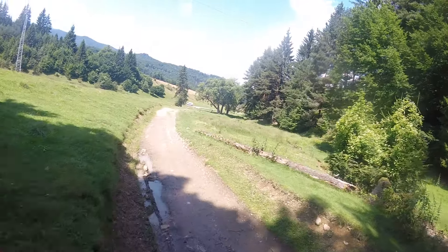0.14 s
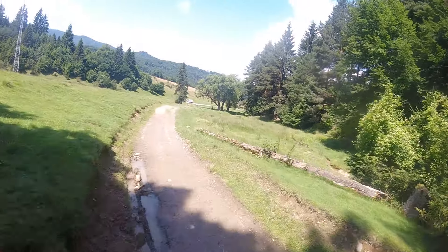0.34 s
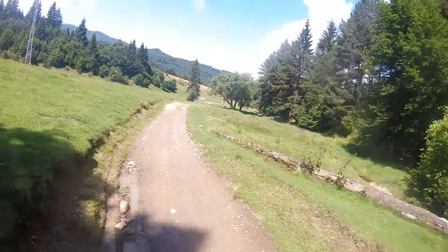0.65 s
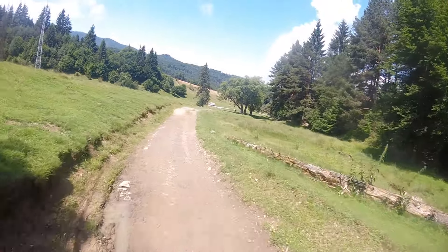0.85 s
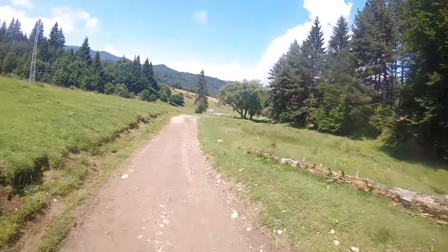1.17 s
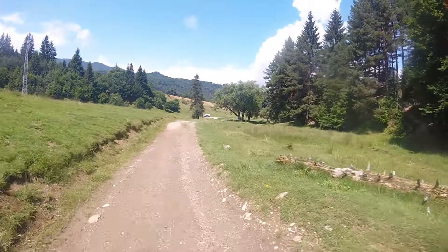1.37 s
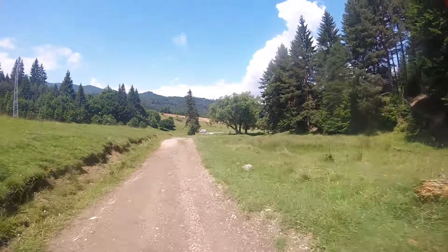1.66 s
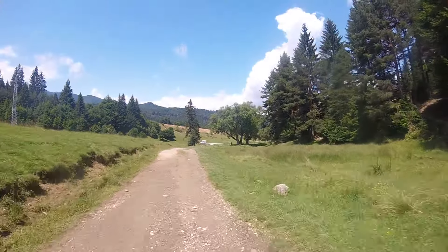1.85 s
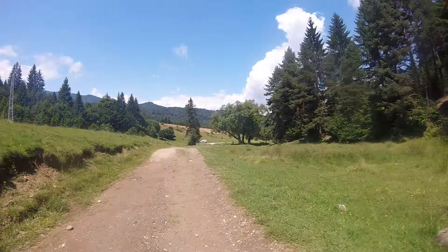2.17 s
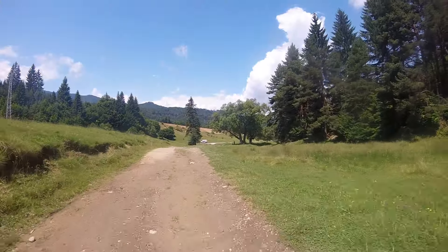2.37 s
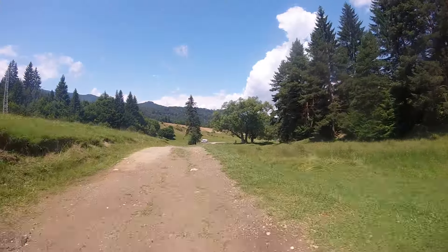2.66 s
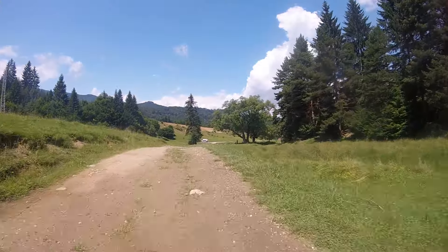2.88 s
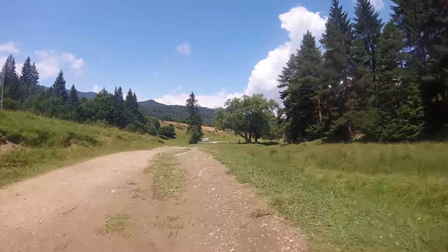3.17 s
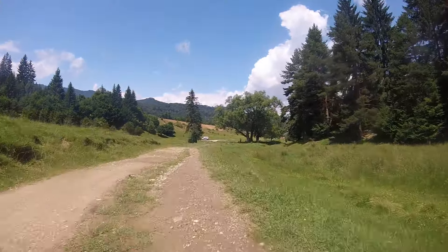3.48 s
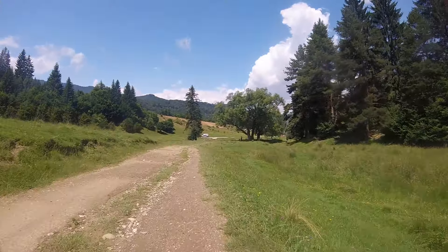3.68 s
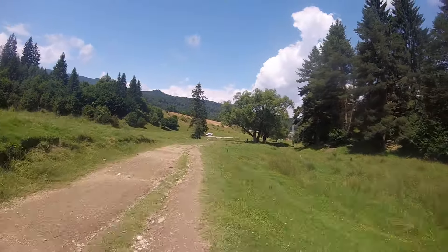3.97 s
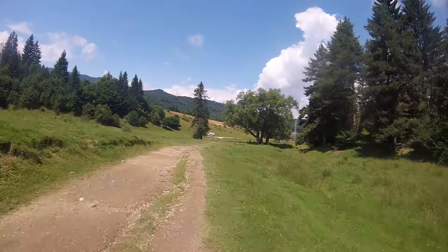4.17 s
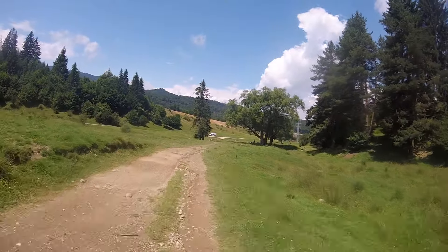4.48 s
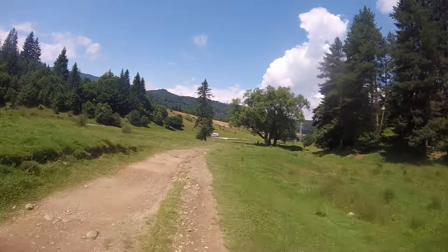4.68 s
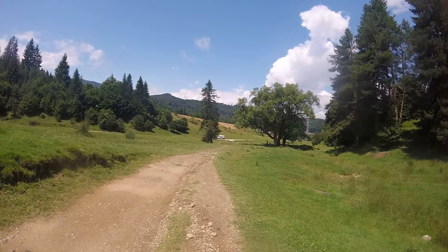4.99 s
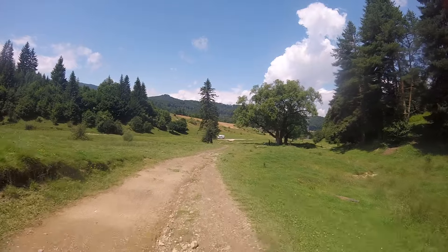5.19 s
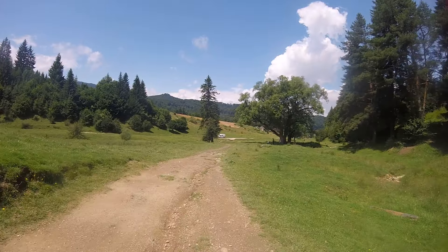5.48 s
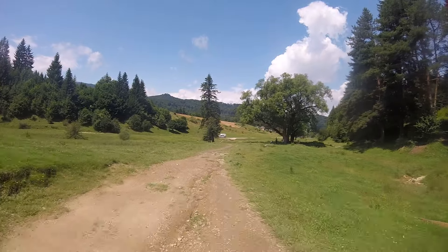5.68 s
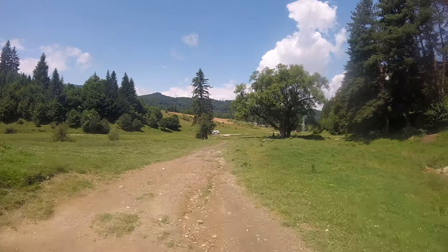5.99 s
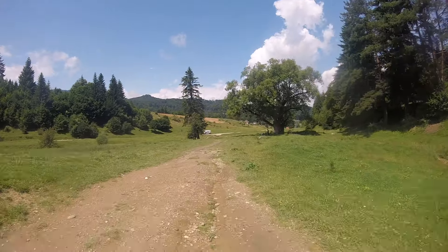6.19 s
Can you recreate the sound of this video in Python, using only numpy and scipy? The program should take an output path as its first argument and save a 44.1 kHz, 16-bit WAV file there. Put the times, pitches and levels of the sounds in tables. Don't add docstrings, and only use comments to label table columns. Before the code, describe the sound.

Continuous close motor drone from a small drone in flight: low lopsided throbbing of two slightly mistuned rotors, higher buzz from two farther ones, propeller hiss and brief thin electrical whine. Throttle changes bend the pitch down and up, highest around three seconds and lowest past five, before it climbs again amid gusty rumble. Dry, open air, microphone shaken inside the case.

```python
import sys
import numpy as np
from scipy import signal
from scipy.io import wavfile
from scipy.ndimage import uniform_filter1d, minimum_filter1d

SR = 44100
rng = np.random.default_rng(int(sys.argv[2]) if len(sys.argv) > 2 else 0)


def invert_db(x):
    u = np.asarray(x, float) / 20
    return 10 ** u


def generate_wav(signal):
    frames = np.transpose(np.atleast_2d(signal))
    scaled = np.clip(frames, -1, 1) * 32767
    pcm = np.round(scaled).astype(np.int16)
    wavfile.write(sys.argv[1], SR, pcm)


N = 279413


def curve(rows):
    s, *columns = np.transpose(rows)
    return [np.interp(np.arange(N) / SR, s, c) for c in columns]


def fine(coarse):
    return np.array([np.interp(np.arange(N) / 100, np.arange(len(c)), c) for c in coarse])


def swells(rows):
    t = np.arange(0, N + 100, 100) / SR
    total = 0
    for middle, half, *db in rows:
        bump = np.cos(np.pi / 2 * np.clip((t - middle) / half, -1, 1)) ** 2
        total = total + np.outer(db, bump)
    return fine(total)


def evened(x):
    return x / np.sqrt(np.mean(x ** 2) + 1e-20)


def drift(hz):
    width = int(SR / hz)
    return evened(uniform_filter1d(uniform_filter1d(rng.standard_normal(N), width), width))


def noise(colour, patchy_db, flicker_db, size=512):
    frames, hz = 4 * N // size + 5, np.fft.rfftfreq(size, 1 / SR)
    a, b, patches = rng.standard_normal((frames, len(hz), 3)).T
    patches = evened(uniform_filter1d(uniform_filter1d(patches, size // 64, 0), 12, 1))
    flicker = evened(uniform_filter1d(rng.standard_normal(frames), 3))
    f, db = np.transpose(colour)
    shape_db = np.interp(np.log(hz + 1), np.log(f), db, right=-120)[:, None]
    z = (a + 1j * b) * invert_db(shape_db + patchy_db * patches + flicker_db * flicker)
    return evened(signal.istft(z, nperseg=size, noverlap=3 * size // 4)[1][:N])


def angle(hz):
    return 2 * np.pi * np.cumsum(hz) / SR


def blades(turn, orders, waver_db, waver_hz):
    out = 0
    for k, db in orders:
        start = 2 * np.pi * rng.random()
        out = out + invert_db(db + waver_db * drift(waver_hz)) * np.cos(np.round(k) * turn + start)
    return out


# (time [s], level [dB])
WIND_LEVEL = [(.04, -41), (.21, -35), (.55, -36), (.7, -32.5), (.95, -33), (1.06, -35), (1.25, -34.5),
              (1.56, -29.5), (1.66, -26.5), (2.2, -23.5), (2.54, -25.5), (2.62, -33), (3.3, -31.5),
              (3.84, -37), (4.45, -35), (5.1, -28), (5.5, -32), (6.3, -29)]
# (middle [s], half length [s], rise [dB])
WIND_GUSTS = [
    (1.93, .1, 4),
    (2.81, .05, 3.5),
    (4.57, .1, 11),
    (5.03, 0.092, 5),
    (5.38, 0.3, 8.5),
    (5.66, 0.24, 10.5),
    (5.84, 0.14, 7.5),
    (5.97, .05, 10),
    (6.07, .04, 4),
    (6.2, .08, 3),
]
# (frequency [Hz], density [dB per Hz])
WIND_COLOUR = [(15, -3), (40, 2.5), (80, -1), (150, 3.5), (260, -5.5), (420, -6), (700, -37), (1200, -54)]


def wind():
    level_db = curve(WIND_LEVEL)[0] + swells(WIND_GUSTS)[0] + 2.0
    return invert_db(level_db) * noise(WIND_COLOUR, 1.0, 0.73, size=1024)


# (time [s], thrust [dB], turbulence [dB])
ROTOR_AIR = [(.2, -43, -35.6), (.36, -46.5, -36), (.62, -46.5, -36.5), (.78, -44, -36.5), (.92, -46, -38.4),
             (1.42, -47.5, -36.5), (1.74, -46, -36.6), (1.98, -48, -38), (2.2, -45.5, -34),
             (2.6, -45.7, -36.4), (3.2, -43, -35.5), (3.7, -46.4, -36), (4.54, -48.5, -37),
             (4.72, -43.5, -33), (5.08, -48, -37.5), (5.7, -42, -30.5), (5.94, -42.5, -31),
             (6.28, -46, -35.5)]
# (frequency [Hz], density [dB per Hz])
WAKE_COLOUR = [(150, -7.5), (400, 4), (700, -3), (1000, 0), (1400, -7), (2000, -11.5), (3000, -20),
               (4200, -33), (6000, -59.5)]
HISS_COLOUR = [(2060, -34), (3500, -11.5), (4180, -12.5), (5160, 1), (7320, 1), (7970, -3.5), (9520, -5.5),
               (11000, -17.5), (14300, -47.5), (22000, -120)]
FIZZ_COLOUR = [(10500, -31.5), (11500, -0.5), (13000, -1), (14500, -3.5), (15300, -13.5)]


def rotor_air(slow, fast):
    hiss_db, wake_db = curve(ROTOR_AIR)
    pulse = 1 + 0.11 * np.cos(fast) + 0.08 * np.cos(slow) + 0.23 * np.cos(3 * fast)
    hiss = invert_db(hiss_db + 0.47) * noise(HISS_COLOUR, 0.59, 0.82, size=256)
    fizz_db = -67.5 + 1.9 * (hiss_db + 41.5) + 1.5 * drift(15)
    fizz = invert_db(fizz_db) * noise(FIZZ_COLOUR, 3.5, 1.5, size=1024)
    wake = invert_db(wake_db + 0.5) * noise(WAKE_COLOUR, 0.8, 0.92)
    return pulse * (hiss + fizz) + wake


# (middle [s], half length [s], lower line [dB], upper line [dB])
COIL_BURSTS = [(.46, .07, 2, 9.5), (1.0, .15, 6, 1), (1.71, .15, 3.5, -2), (2.1, .06, 1, 12),
               (3.47, .08, 4.5, 2), (4.251, .09, 3, 6), (4.76, .3, 1.5, 6), (5.37, .1, 2, 11),
               (5.6, .08, 0, 5), (5.76, .1, 3, -3), (5.91, .08, 2, 7), (6.05, .08, 4, 3)]


def coil_whine():
    thrust_db = 0.7 * (curve(ROTOR_AIR)[0] + 46)
    out = 0
    for burst_db, line_db, hz in zip(swells(COIL_BURSTS), (0, -2.5), (7140, 7550)):
        level_db = -62 + 1.7 * (burst_db + thrust_db + line_db) + 3.7 * drift(25)
        out = out + invert_db(level_db) * np.cos(angle(hz + 12 * drift(50)))
    return out


# (start [s], length [s], near shaft reached [Hz], far shaft reached [Hz])
STICK_MOVES = [(-.2, .1, 173.5, 192), (0, 0.29, 170.2, 199.6), (.29, 0.072, 147.7, 171.2),
               (0.369, 0.058, 143.2, 163.5), (0.429, .13, 149.7, 176.6), (0.687, 0.087, 168.7, 201.2),
               (0.819, .12, 153, 183.5), (1.03, 0.54, 153.4, 189), (1.6, .13, 156.3, 199),
               (1.821, 0.086, 142.8, 177.3), (1.91, 0.091, 138.3, 179.5), (2.029, 0.16, 146.8, 185.5),
               (2.37, 0.14, 153.6, 191), (2.602, 0.1096, 165.2, 202), (3.031, 0.29, 169.7, 200.9),
               (3.326, 0.099, 160.8, 189.8), (3.552, 0.089, 153, 181), (3.699, .2, 154.8, 183.6),
               (4.14, .15, 148.3, 177), (4.4, .18, 139.4, 168), (4.63, .11, 150, 187.8),
               (4.779, .15, 145.8, 186.2), (4.93, .12, 140.8, 176.8), (5.07, .2, 134, 178.3),
               (5.292, .07, 128.3, 170.9), (5.362, 0.078, 138.5, 173.4), (5.469, 0.21, 133.9, 178.4),
               (5.75, .12, 132.6, 173.9), (5.909, .12, 153.3, 188.6), (6.042, .12, 157.2, 193)]


def shaft_speeds():
    t, moves = np.arange(0, N + 100, 100) / SR, np.array(STICK_MOVES)
    steps = np.diff(moves[:, 2:], axis=0, prepend=0)
    hz = 0
    for (start, length), step in zip(moves[:, :2], steps):
        ramp = np.clip((t - start) / max(length, 0.02), 0, 1)
        hz = hz + np.outer(step, ramp)
    return fine(uniform_filter1d(hz, size=9, mode="nearest"))


# (multiple of the shaft, level over the far overtone layer [dB])
FAR_OVERTONES = [(6, -0.4), (9, -6.5), (12, -14), (15, -21.5), (18, -28.5)]


def far_rotors(hz, blade_db, overtone_db, unbalance_db):
    out = 0
    for rotor_db, hunt in ((-1.5, 0.00447), (-7.5, 0.007964)):
        turn = angle(hz * (1 + hunt * drift(14) + 0.004 * drift(60)))
        blade_tone = invert_db(blade_db) * blades(turn, [(3, 0.032)], 1.1, 5.8)
        overtones = invert_db(overtone_db) * blades(turn, FAR_OVERTONES, 0.5, 40)
        unbalance = invert_db(unbalance_db) * np.cos(turn)
        out = out + invert_db(rotor_db) * (blade_tone + overtones + unbalance)
    return out


# (first one [s], how many in the run)
CANCELLATIONS = [(-.02, 3), (.229, 1), (.406, 2), (.841, 1), (.932, 2), (1.077, 3), (1.367, 3), (1.633, 1),
                 (1.751, 4), (2.175, 4), (2.551, 3), (2.85, 3), (3.102, 1), (3.204, 2), (3.456, 1),
                 (3.605, 1), (3.798, 1), (4.234, 1), (4.556, 1), (4.735, 1), (5.029, 1), (5.238, 1),
                 (5.385, 1), (5.59, 1), (5.73, 3), (5.964, 1), (6.057, 1), (6.175, 1), (6.325, 1),
                 (6.46, 1)]


def near_shafts(hz):
    slow = angle(hz + 0.605 * drift(30))
    s, count = np.transpose(CANCELLATIONS)
    gained = np.interp(np.arange(N) / SR, s, np.cumsum(count) - count)
    return slow, slow + 2 * np.pi * (uniform_filter1d(gained, 2000, mode="nearest") + 0.5)


def near_rotor(turn, blade_db, orders):
    ragged = turn + 0.16 * drift(40)
    overtones = invert_db(curve(ROTOR_AIR)[1]) * blades(ragged, orders, 4.5, 7)
    return invert_db(blade_db + 0.2) * blades(turn, [(3, 0.024)], 2.0, 52) + overtones


# (time [s], summed shake [dB], share of the faster shaft [0-1])
CASE_SHAKE = [(0, -2.5, 0.37), (.41, -3, 0.43), (.9, -3.4, .39),(1.75, -3, 0.37), (1.96, -5.5, 0.59),
              (2.2, -3.5, .49), (2.5, -3.5, 0.42), (3.8, -2, 0.37), (4.23, -3.5, 0.69), (4.56, -6, 0.17),
              (4.74, -1, 0.67), (5.03, -4.5, 0.51), (5.24, -7, 0.67), (5.39, -7.5, 0.49), (5.65, -5, 0.62),
              (5.89, -4.5, 0.75), (6.06, -1.5, .38), (6.34, -3.5, 0.3)]


def case_shake(slow, fast, bend_db):
    level_db, share = curve(CASE_SHAKE)
    swing = (1 - share) * np.exp(1j * slow) + share * np.exp(1j * fast)
    swing *= invert_db(level_db + 1.5) * np.tanh(1.307 * abs(swing)) / (abs(swing) + 1e-9)
    return swing.real - invert_db(bend_db) * (swing ** 2).real


# (time [s], near [dB], far [dB])
BLADE_LOAD = [(.05, -26, -32.5), (.21, -28, -42), (.4, -32.5, -32), (.7, -39.5, -43), (1.0, -39, -36),
              (1.35, -28.5, -33.5), (2.0, -31, -31.5), (2.55, -29.5, -36), (2.9, -36.5, -38.5),
              (3.45, -31.5, -31.5), (3.75, -31, -36), (4.05, -32, -32.5), (4.3, -37.5, -35),
              (4.55, -29.5, -27), (4.85, -32.5, -37.5), (5.3, -31, -29.5), (5.9, -20, -23.5),
              (6.3, -26.5, -31.5)]
# (level [dB], slope by bite [dB/dB], slope by turbulence [dB/dB])
LAYER_LEVELS = [
    (-32, 0.66, -0.5),
    (-30.5, 1.0, 0.044),
    (-40, 0.05, 1.46),
]
# (multiple of the shaft, level over the turbulence [dB])
SLOW_OVERTONES = [(4, -9.5), (5, -11), (6, -11.5), (7, -16), (8, -23), (9, -21.5), (12, -21.5)]
FAST_OVERTONES = [(4, -12), (5, -10.5), (6, -9), (7, -18), (8, -24.5), (9, -19.5), (12, -26)]


def scene():
    near_hz, far_hz = shaft_speeds()
    thrust_db, turbulence_db = curve(ROTOR_AIR)
    bite_db, far_db = curve(BLADE_LOAD)
    slow_db, fast_db, overtone_db = (db + by_bite * (bite_db + 32) + by_turbulence * (turbulence_db + 36.5)
                                     for db, by_bite, by_turbulence in LAYER_LEVELS)
    slow, fast = near_shafts(near_hz)
    background = wind() + rotor_air(slow, fast) + coil_whine()
    unbalance_db = -26 + 0.85 * (thrust_db + 46)
    far = far_rotors(far_hz, far_db, overtone_db, unbalance_db)
    near = near_rotor(slow, slow_db, SLOW_OVERTONES) + near_rotor(fast, fast_db, FAST_OVERTONES)
    bend_db = -12.5 - 0.1742 * (near_hz - 153)
    return (background + far + near + case_shake(slow, fast, bend_db))[None]


def roll_off(x):
    return signal.sosfilt(signal.butter(12, 15140, fs=SR, output="sos"), x)


def record(dry):
    bent = dry - 0.064 * dry ** 2
    level = signal.sosfilt(signal.butter(1, 12, "high", fs=SR, output="sos"), bent)
    peak = -minimum_filter1d(-abs(level), size=500)
    gain = (1 + (peak / 0.92) ** 8) ** (-1 / 9)
    held = level * uniform_filter1d(gain, size=300)
    return roll_off(held)


dry = scene()
out = record(dry)
generate_wav(out)
```